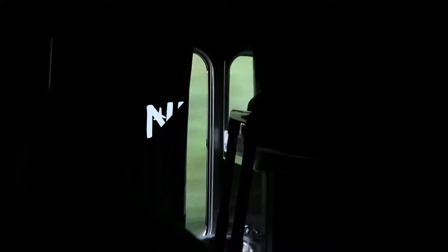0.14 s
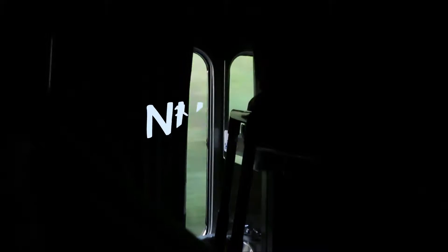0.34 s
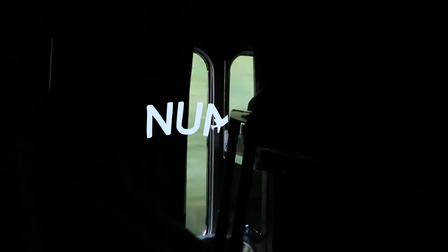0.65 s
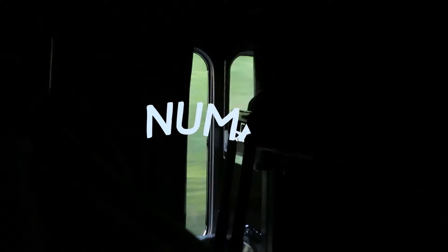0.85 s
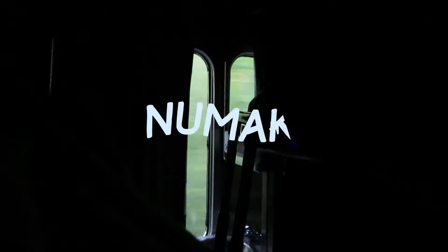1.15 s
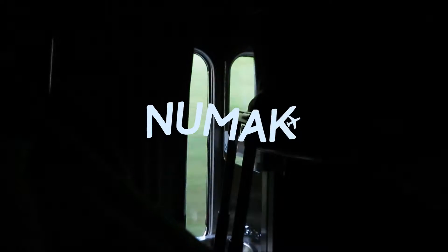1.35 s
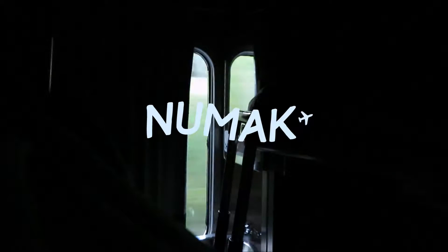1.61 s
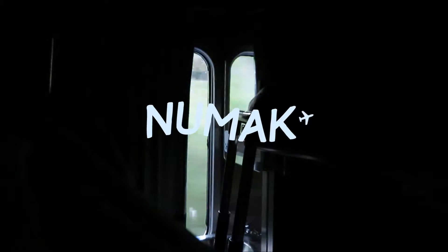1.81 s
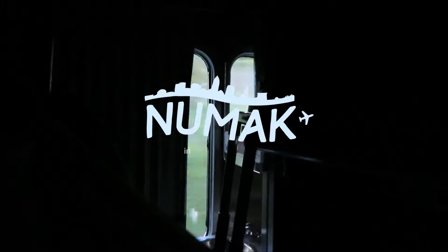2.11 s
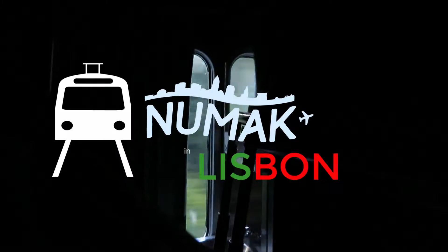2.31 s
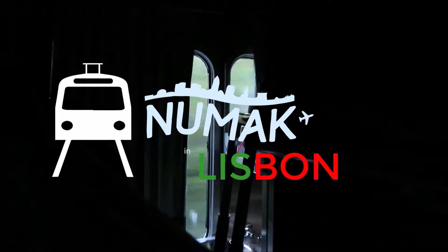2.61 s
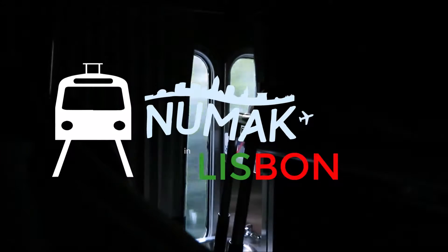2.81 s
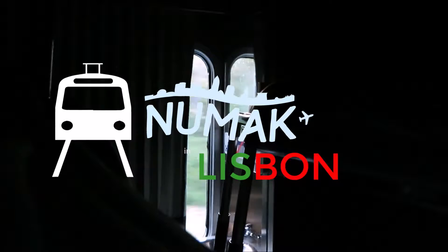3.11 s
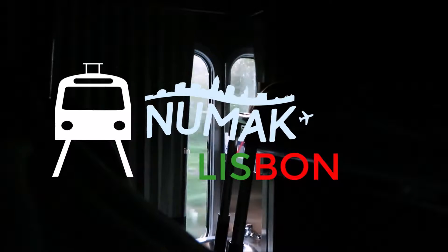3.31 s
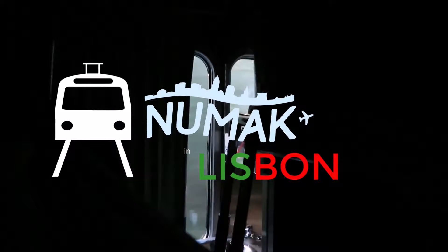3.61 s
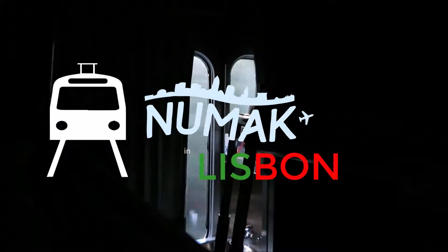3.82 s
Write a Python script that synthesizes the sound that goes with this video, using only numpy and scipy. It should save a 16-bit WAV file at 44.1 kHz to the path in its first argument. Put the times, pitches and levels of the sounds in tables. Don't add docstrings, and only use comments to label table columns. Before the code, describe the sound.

Moving train heard inside the carriage: deep steady rumble, engine hum, joint thuds and loose knocks

```python
import sys
import numpy as np
from scipy import signal
from scipy.fft import rfft, irfft
from scipy.io import wavfile
from scipy.ndimage import uniform_filter1d

SR = 44100
rng = np.random.default_rng(int(sys.argv[2]) if len(sys.argv) > 2 else 0)


def gain_from_db(level_db):
    decades = np.asarray(level_db, float) / 20
    return 10 ** decades


def wav_out(sig):
    wavfile.write(sys.argv[1], SR, np.round(np.clip(np.atleast_2d(sig).T, -1, 1) * 32767).astype(np.int16))


N = 174195


# t/s, shaft speed f/Hz, second-order level/dB, fourth-order level/dB
SHAFT = [(0, 23.8, -51, -28), (.2, 23.47, -34.5, -34), (.55, 23.54, -39.5, -33.5), (.85, 23.43, -46, -34),
         (1.05, 23.46, -48, -28.5), (1.3, 23.57, -29.5, -28), (1.6, 23.48, -43.5, -33.5),
         (1.9, 23.47, -33, -36), (2.2, 23.37, -31.5, -35.5), (2.5, 23.37, -34, -33),
         (2.8, 23.51, -28.5, -32), (3.1, 23.46, -26.5, -38), (3.4, 23.55, -32.5, -43),
         (3.6, 23.54, -34, -40), (3.78, 23.46, -31.5, -32), (3.95, 23.47, -46, -39)]
# multiple of shaft speed, level/dB, wobble/dB
SHAFT_ORDERS = [
    (1, -7.5, 2.5),
    (2, -2.5, 0.5),
    (3, -8.5, 5),
    (4, -4, 2),
    (6, -14.5, 2),
    (7, -11.5, 2.5),
    (10, -15.5, 5.5),
    (20, -30.5, 4),
    (35, -27, 5),
]


def engine():
    wobble_hz, load_share, slip_turns = 3.5, 0.14, 0.239
    turns = np.cumsum(curve(SHAFT, axis=1)) / SR
    second_db, fourth_db = curve(SHAFT, axis=2), curve(SHAFT, axis=3)
    others_db = load_share * second_db + (1 - load_share) * second_db.mean()
    out = np.zeros(N)
    for order, db, wobble_db in SHAFT_ORDERS:
        load_db = {2: second_db, 4: fourth_db}.get(order, others_db)
        slip = slip_turns * np.sqrt(order) * drift(wobble_hz) + rng.random()
        level_db = load_db + db + wobble_db * drift(wobble_hz)
        out += np.sqrt(2) * gain_from_db(level_db) * np.sin(2 * np.pi * (order * turns + slip))
    return out


# t/s, length/s, level/dB, f/Hz
BUMPS = [(0.239, 0.17, -32.5, 66.6), (1.159, 0.11, -29.5, 68.6), (1.601, 0.17, -33.5, 117.1),
         (2.145, 0.075, -23.5, 98.6), (2.297, 0.22, -29.5, 67), (2.97, 0.15, -31.5, 59.4),
         (3.279, 0.12, -36, 99.5), (3.418, 0.13, -27.5, 65.6), (3.86, 0.12, -30.5, 92.6),
         (3.25, 0.086, -31.5, 225), (3.326, 0.08, -27, 232), (3.395, 0.053, -29, 187.5),
         (3.441, 0.2, -35, 246.2), (3.38, 0.086, -32, 151.5), (3.44, 0.072, -30, 130),
         (.96, 0.13, -33.5, 229.6), (1.47, 0.073, -31.5, 228), (2.76, 0.086, -34.5, 226.7)]


def bumps():
    rise = 0.3
    out = np.zeros(N)
    for start, length, db, hz in BUMPS:
        t = np.arange(0, 2 * length, 1 / SR)
        u = t / length
        attack = np.sin(np.pi / 2 * np.minimum(u / rise, 1)) ** 2
        decay = gain_from_db(-20 * np.maximum(u - rise, 0) ** 2)
        tone = np.sin(2 * np.pi * (hz * t + rng.random()))
        part = out[round(start * SR):][:len(t)]
        part += (np.sqrt(2) * gain_from_db(db) * attack * decay * tone)[:len(part)]
    return out


# f/Hz, level per Hz/dB
BOOM = [(11, -45.5), (18, -4), (91, 0.5), (167, -6), (226, -5), (285, -19), (330, -19.5), (430, -47),
        (730, -120)]


def floor_boom(track_db):
    level_db = -32 + 1 + 0.76 * track_db + 1.08 * drift(5.0)
    return gain_from_db(level_db) * evened(colour(rng.standard_normal(N), BOOM))


# f/Hz, level per Hz/dB
ROAR = [(150, -38), (260, -5.5), (286, -6), (420, -7), (536, -11), (677, -8.5), (1190, -17.5), (2050, -19),
        (3300, -31), (4290, -56), (7260, -120)]


def wheel_roar(track_db):
    noise = colour(rng.standard_normal(N), ROAR)
    return gain_from_db(-43 + 0.43 * track_db) * patchy(noise, patch_db=1.34, flicker_db=-0.1)


# f/Hz, width/Hz, level/dB
PANELS = [(232, 35, -43.5), (166.9, 19, -47.5), (474.4, 21, -57), (678, 35, -58.5), (816, 62, -58.5),
          (1045, 80, -61), (1297, 17, -64.5), (1444.5, 49, -62.5), (1554, 7.7, -66.5), (1710, 23, -65.5),
          (1828, 22, -68.5), (2001, 56, -63), (2252, 37, -67), (2717, 44, -68.5), (2900, 30, -73)]
# f/Hz, width/Hz, level/dB
WHINES = [
    (4732, 14, -88),
    (5300, 60, -86),
    (6390, 50, -87),
    (13351, 14, -105),
]


def resonances(track_db, shaking):
    out = np.zeros(N)
    for hz, width, db in PANELS + WHINES:
        out += gain_from_db(db + 1.34 * drift(4.03)) * band(shaking, hz, width)
    return gain_from_db(0.78 * track_db) * out


# t/s, length/s, level/dB, f/Hz, width/Hz
THUDS = [(0.45, 0.041, -42.5, 470, 560), (0.4, 0.051, -49.5, 1240, 1200), (1.2, 0.099, -50, 1703, 900),
         (1, 0.21, -47, 681, 100), (2, 0.11, -41.5, 697, 320), (2.135, 0.036, -39.5, 328.7, 160),
         (2, 0.042, -39, 690, 460), (2.33, 0.086, -49.5, 1700, 860), (2.358, 0.042, -42, 900, 470),
         (1.2, 0.28, -51.5, 813, 110), (1.6, 0.21, -54, 1680, 300), (3.37, 0.12, -32, 181, 110),
         (0.44, 0.31, -40.5, 199, 32), (3.75, .2, -37.5, 184.6, 48), (1.9, .12, -38, 160.2, 37),
         (0.4, 0.21, -39, 170.5, 26), (2.5, 0.21, -42, 205, 30), (1.34, .2, -38.5, 250, 36),
         (3.5, 0.16, -42, 248, 40), (2.605, 0.04, -47, 1830, 890), (3.02, .05, -50, 540, 130),
         (2.44, 0.062, -43.5, 654, 260), (3.37, 0.12, -44, 500, 430), (.0, 0.031, -44.5, 667, 120),
         (.13, 0.1, -50, 1180, 1070), (2.743, 0.026, -49, 730, 490), (2.5, 0.073, -48, 1730, 945)]


def thuds(blows):
    return bursts(THUDS, 0.14, blows)


# t/s, level/dB, f/Hz, t60/s
KNOCKS = [(.776, -36, 600, .04), (.784, -34, 389, 0.075), (.797, -38, 1150, .05), (.803, -42, 1640, .06),
          (1.172, -51.5, 5350, .04), (1.174, -60, 7750, .03), (1.188, -57, 5400, .04),
          (2.131, -32, 790, 0.067), (2.192, -32, 684, .08), (2.323, -35.5, 1430, 0.049),
          (2.33, -30, 640, .05), (2.346, -33, 720, .04), (2.365, -31, 810, .05), (2.372, -36, 960, .04),
          (2.415, -36, 600, 0.043), (2.625, -37, 800, 0.053), (2.744, -33, 720, .05),
          (3.425, -42, 615, .12), (3.43, -34, 388, 0.14)]


def knocks():
    rise_s = 0.0019
    out, t = np.zeros(N), np.arange(0, 0.15, 1 / SR)
    for start, db, hz, t60 in KNOCKS:
        envelope = np.minimum(t / rise_s, 1) * gain_from_db(db - 60 * t / t60)
        out[round(start * SR):][:len(t)] += envelope * np.sin(2 * np.pi * hz * t)
    return out


# t/s, length/s, level/dB, f/Hz, width/Hz
RATTLES = [
    (1.145, .075, -52.5, 2700, 890),
    (1.14, .085, -61, 5090, 950),
    (1.15, 0.082, -60.5, 3840, 1470),
    (1.165, 0.05, -72, 8900, 3000),
    (1.4, 0.034, -66, 3500, 1202),
    (2.366, .012, -70.5, 12000, 6060),
    (2.48, 0.058, -51.5, 3300, 1700),
    (2.482, 0.073, -60.5, 5200, 2100),
    (2.49, .06, -73, 8400, 3000),
    (0.295, 0.047, -66, 4500, 2000),
]


def rattles(shaking, blows):
    ticks_per_s, spread_db = 1800, 4
    hits = rng.random(N) < ticks_per_s / SR
    ticks = hits * gain_from_db(spread_db * rng.exponential(1, N)) * blows
    return bursts(RATTLES, 0.19, evened(ticks) + 1.7 * shaking)


# f/Hz, level per Hz/dB
HISS = [(2200, -36.5), (3300, -5.5), (5000, -9.5), (7000, -17), (10000, -23), (13000, -29), (15000, -30.5),
        (16000, -48)]


def air_hiss(track_db):
    noise = colour(rng.standard_normal(N), HISS)
    return gain_from_db(-63.5 + 0.15 * track_db) * patchy(noise, patch_db=0.8, flicker_db=0.25)


# t/s, level/dB
TRACK = [(0, -35.5), (.3, -34.5), (.6, -34), (.9, -34), (1.05, -35.5), (1.2, -31.5), (1.5, -32), (1.8, -33),
         (2.02, -34.5), (2.15, -32), (2.4, -34), (2.7, -33.5), (3.0, -30.5), (3.2, -34), (3.4, -31.5),
         (3.6, -32), (3.95, -35)]


def carriage():
    track_db = curve(TRACK, axis=1)
    track_db = track_db - track_db.mean()
    shaking, blows = rng.standard_normal((2, N))
    rolling = floor_boom(track_db) + wheel_roar(track_db) + resonances(track_db, shaking)
    return rolling + thuds(blows) + rattles(shaking, blows) + air_hiss(track_db)


def bursts(table, rise, grain):
    out = np.zeros(N)
    for start, length, db, hz, width in table:
        at = round(start * SR)
        u = np.arange(0, 2 * length, 1 / SR)[:N - at] / length
        shape = np.minimum(u / rise, 1) * gain_from_db(-14 * np.maximum(u - rise, 0) ** 2)
        ring = evened(shape * steep(grain[at:at + len(u)], hz, width))
        out[at:at + len(u)] += gain_from_db(db) * ring / evened(shape).max()
    return out


def evened(x):
    return x / np.sqrt(np.mean(x ** 2) + 1e-20)


def read(points, hz):
    f, value = np.transpose(points)
    return np.interp(np.log(hz + 1), np.log(f + 1), value)


def colour(x, points):
    gain = gain_from_db(read(points, np.fft.rfftfreq(N, 1 / SR)))
    return irfft(rfft(x) * gain, N)


def curve(table, axis):
    return np.interp(np.arange(N) / SR, [r[0] for r in table], [r[axis] for r in table])


def drift(hz):
    t = np.arange(0, N + 200, 200) / SR
    slow = np.zeros(len(t))
    for f in hz * np.geomspace(0.1, 1, 20):
        slow += np.sin(2 * np.pi * (f * t + rng.random())) / np.sqrt(f)
    return np.interp(np.arange(N) / SR, t, evened(slow))


def band(x, hz, width):
    b, a = signal.iirpeak(min(hz, 0.45 * SR), max(hz / width, 0.3), SR)
    return evened(signal.lfilter(b, a, signal.lfilter(b, a, x)))


def steep(x, hz, width):
    top = np.hypot(hz, width / 2) + width / 2
    edges = [hz ** 2 / top, min(top, 0.45 * SR)]
    sos = signal.butter(3, edges, "band", fs=SR, output="sos")
    return evened(signal.sosfilt(sos, x))


def patchy(x, patch_db, flicker_db):
    z = signal.stft(x, nperseg=512, noverlap=384)[2]
    p = rng.standard_normal(z.shape[::-1]).T
    across_pitch = uniform_filter1d(p, size=8, axis=0)
    patches = evened(uniform_filter1d(across_pitch, size=24, axis=1))
    flicker = evened(uniform_filter1d(p[0], size=14))
    gain = gain_from_db(patch_db * patches + flicker_db * flicker)
    return evened(signal.istft(z * gain, nperseg=512, noverlap=384)[1][:N])


# f/Hz, level/dB
PAIR = [(60, -78), (92, -64.0), (140, -66), (220, -46.5), (340, -19.5), (520, -21), (790, -19.5),
        (1220, -15.0), (1870, -19.5), (2880, -9.5), (5500, -5), (9000, -1.0), (14000, 0.5)]
# f/Hz, level/dB
TILT = [(300, 0), (650, -1), (1300, -0.5), (5000, -.3), (9000, 0)]


def scene():
    mid = engine() + bumps() + carriage() + knocks()
    hz = np.fft.rfftfreq(N, 1 / SR)
    lean = irfft(rfft(mid) * np.tanh(read(TILT, hz) * np.log(10) / 40), N)
    side = colour(carriage(), PAIR) + lean + gain_from_db(-20) * knocks()
    return np.array([mid + side, mid - side])


def roll_off(x):
    return signal.sosfilt(signal.butter(12, 15150, fs=SR, output="sos"), x)


def record(dry):
    fade = np.minimum(np.arange(N)[::-1] / (0.004 * SR), 1)
    return roll_off(dry * fade)


dry = scene()
out = record(dry)
wav_out(out)
```